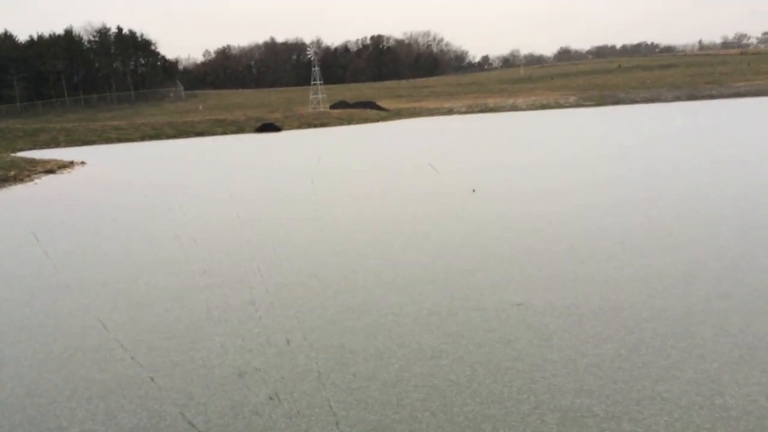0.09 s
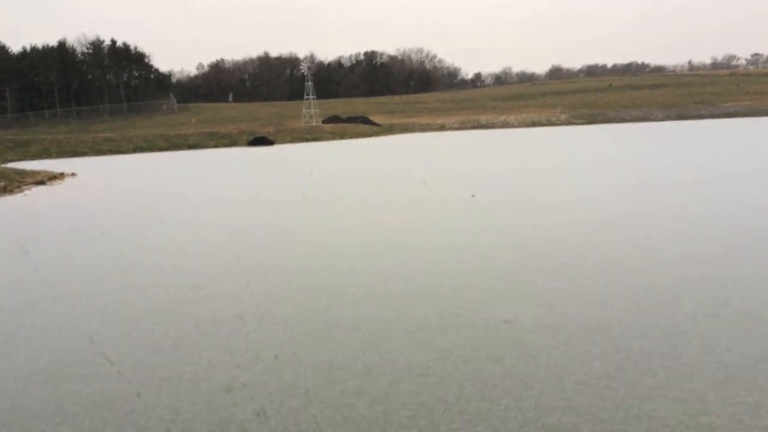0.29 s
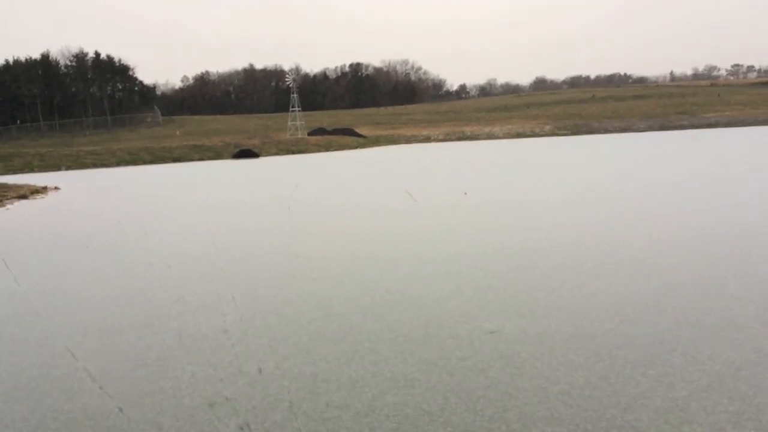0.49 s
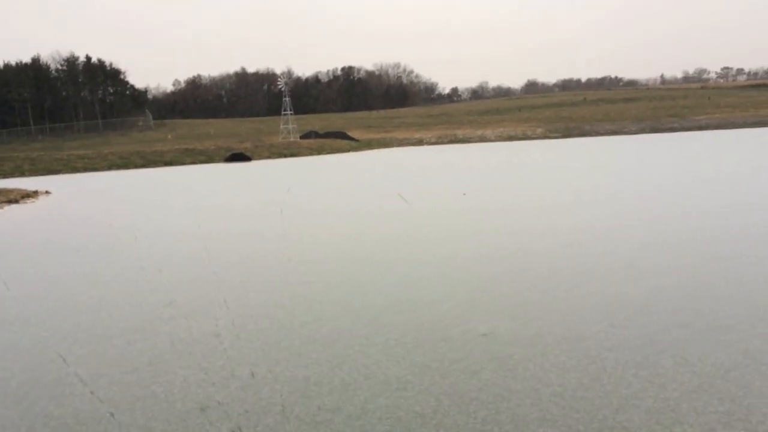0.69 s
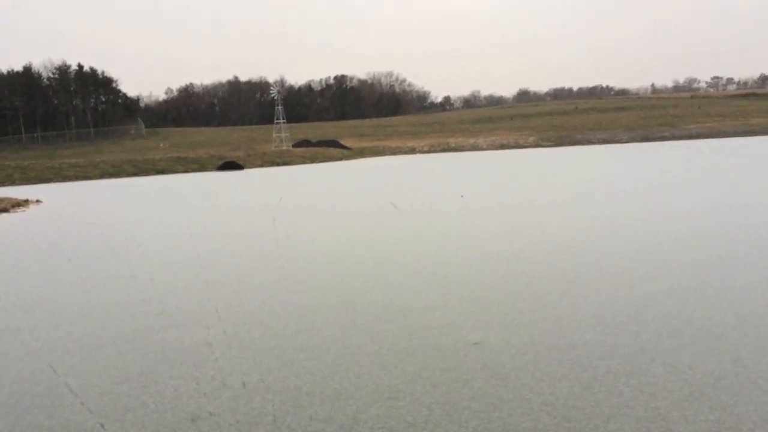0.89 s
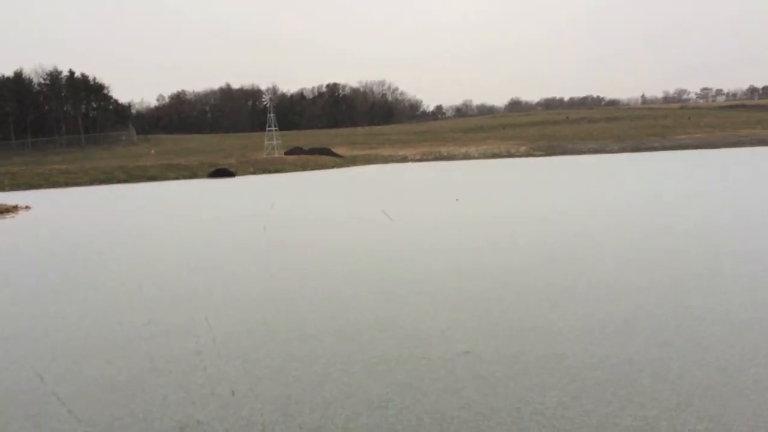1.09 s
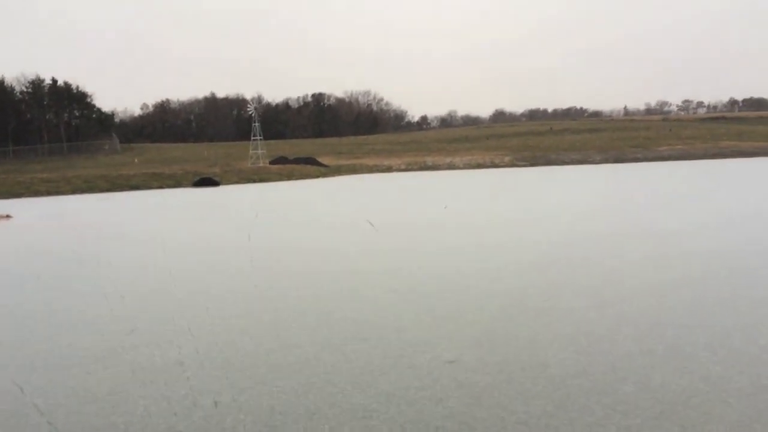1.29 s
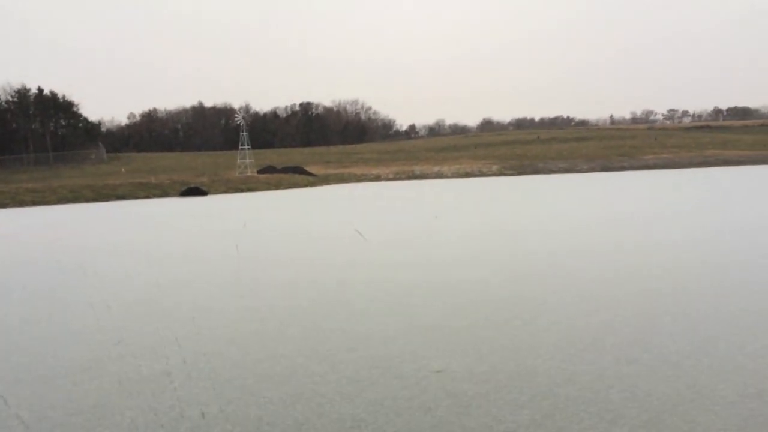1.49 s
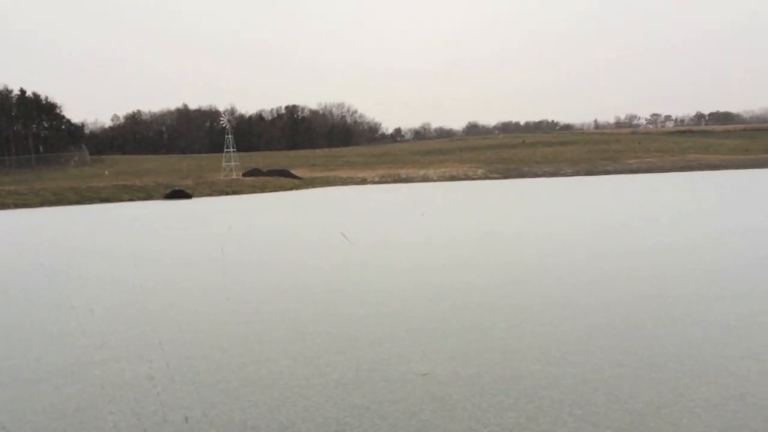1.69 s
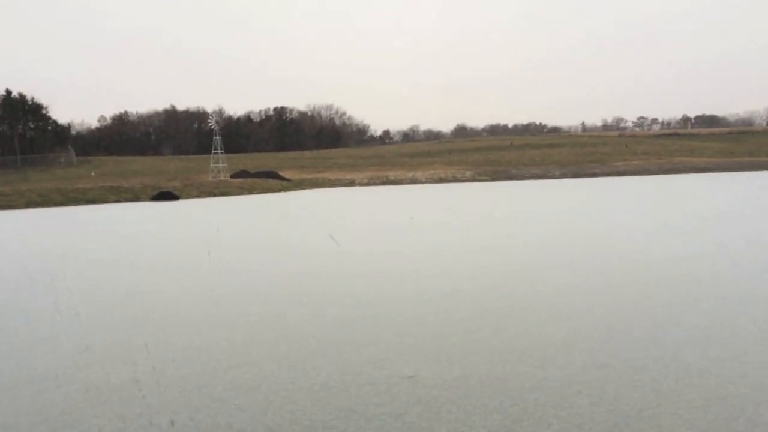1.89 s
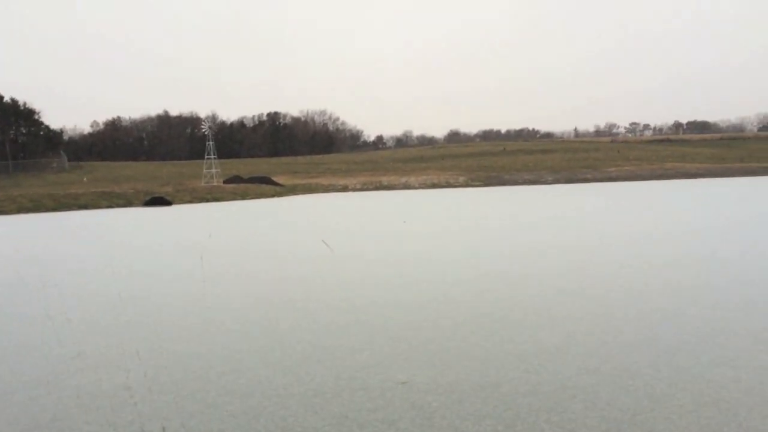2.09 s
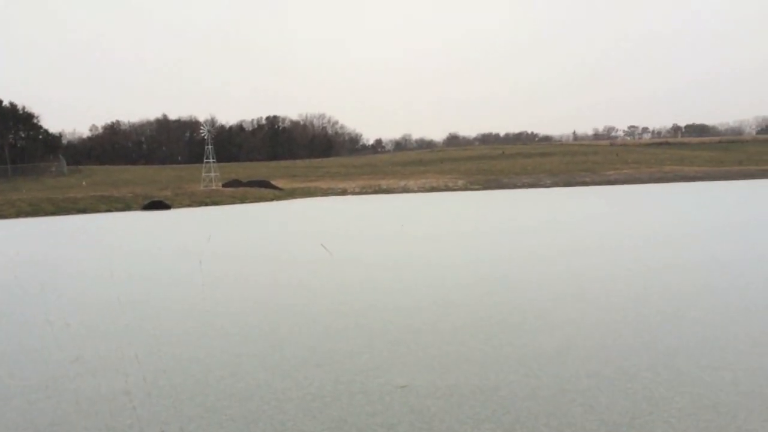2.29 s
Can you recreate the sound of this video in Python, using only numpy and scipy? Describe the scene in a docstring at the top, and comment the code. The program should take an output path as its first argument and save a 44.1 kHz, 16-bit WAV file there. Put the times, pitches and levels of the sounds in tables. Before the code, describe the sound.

Skipping stone on a thinly frozen pond: quick bird-like chirps dropping in pitch, echoing faintly from the banks

```python
"""At a thinly frozen pond, a stone skips away over the ice, often touching twice in one bounce.
Each touch sends a bending wave through the ice. Its treble runs ahead, so one hears a chirp that falls to
the pitch at which the wave is as slow as sound in air, and ends with the click that came through the air.
The banks scatter the chirps and the sheet rings on faintly, both as decaying noise.
Faint ticks crackle at the rim of the ice; a hush and a low rumble of coloured noise lie over the fields."""
import sys
import numpy as np
from scipy import signal
from scipy.fft import rfft, irfft, next_fast_len
from scipy.io import wavfile

SR = 44100
rng = np.random.default_rng(int(sys.argv[2]) if len(sys.argv) > 2 else 0)


def transcribe(u):
    """Save the signal u as a 16-bit wav file named by the first command-line argument.

    u: samples, shape (n,) or (channels, n), limited to [-1, 1]; the rate is SR.
    q: integer samples, one column per channel.
    """
    v = np.clip(np.atleast_2d(u).T, -1, 1)
    q = np.round(v * 32767).astype(np.int16)
    wavfile.write(sys.argv[1], SR, q)


N = 101430  # length in samples, 2.3 s
SOUND_M_PER_S = 335  # speed of sound in air
DISPERSION = 0.4  # the ice's wave number grows as pitch to this power
TOP_HZ = 15500  # band limit, where the chirps also begin


def stone():
    """Every touch sends a chirp and edge wave through the ice, a click through the air, and echoes."""
    # The stone's path. Each row: time in seconds, distance in m, pitch in Hz at which the ice wave
    stone_path = [(0.238, 10.6, 1164, 2.5), (0.458, 12.12, 1175, 2.5), (.8, 14.2, 1180, 3.5),
                  (1.0, 16.36, 1173, 7.5), (1.358, 18.1, 1158, 6), (1.661, 20.1, 1152, 5.5),
                  (2.03, 20.4, 1148, 4.5), (2.23, 21.5, 1195, 23)]
    # Touches of the stone. Each row: arrival of the click in seconds, relative level in dB,
    # contact time in ms, grit in dB, click over chirp in dB.
    touches = [(0.243, -19, 0.65, -18, 0), (0.458, -47.5, .6, -15.5, -7.5), (0.4644, -38, 0.7, -10, -28.5),
               (0.4693, -16.5, 0.16, -43, -2.5), (0.8, -29, 0.25, -13.5, -25),
               (0.8022, -38.6, 0.23, -3.5, 5), (0.9931, -31.5, 0.47, -11, -11.5),
               (1.0083, -34.5, 0.41, -16, 4), (1.3633, -22, .66, -20, -10),
               (1.3674, -36.5, 0.55, -11.5, -8.5), (1.6508, -40, 0.3, -15, 1),
               (1.6578, -31.5, 0.38, -29, -24), (1.6667, -23.5, .34, -25.5, -4.5),
               (2.025, -27.5, 0.41, -30, -16), (2.0321, -29, 0.4, -20, -0.5),
               (2.233, -38.5, 0.51, -19.5, -7), (2.242, -36.5, 0.43, -28, -6.5)]
    # Tone of the wave, which has little bass. Each row: pitch in Hz, level in dB.
    wave_tone = [(60, -30.5), (250, -12.5), (500, -2), (800, 0.5)]
    # Tone of the click through the air. Each row: pitch in Hz, level in dB.
    click_tone = [(100, -28.5), (400, -17), (1200, -9.5), (4000, -3), (8000, -8.5), (15000, -17)]

    out = np.zeros(N)
    times, *columns = np.transpose(stone_path)
    for click_s, db, contact_ms, grit_db, click_db in touches:
        metres, ice_hz, fade_db = [np.interp(click_s, times, column) for column in columns]
        falling = chirp(metres, ice_hz)
        fade = amp(np.linspace(0, -fade_db, len(falling)))
        wave = np.zeros(SR // 4)
        add(wave, 0, falling * fade)
        add(wave, 0, edge_wave(metres, ice_hz))
        wave = amp(db) * colour(force(wave, contact_ms, grit_db), wave_tone)

        # the click lands where the chirp ends
        start_s = click_s - len(falling) / SR
        click = colour(signal.unit_impulse(len(wave), len(falling)), click_tone)
        add(out, start_s, wave + amp(db + click_db) * click)
        add(out, start_s, signal.fftconvolve(wave, scatter()))
    return out


def chirp(metres, ice_hz):
    """Each pitch runs through the ice, leaves it at its own angle and goes on through the air."""
    # Tone of the chirp. Each row: pitch in Hz, level in dB.
    chirp_tone = [(1170, -3), (1250, 0), (1450, 2), (1800, 1.5), (2500, -4), (4000, -11), (7000, -17),
                  (14000, -40)]
    height_m = 1.6  # listening point above the ice

    hz = np.geomspace(TOP_HZ, ice_hz + 1, 2000)
    slow = (ice_hz / hz) ** (1 - DISPERSION)  # speed of sound in air over the wave's phase speed
    air_m = height_m / np.sqrt(1 - slow ** 2)
    ice_m = metres - air_m * slow
    # a packet of waves travels at group speed, so its delay in the ice is DISPERSION * slow
    arrival_s = (ice_m * DISPERSION * slow + air_m) / SOUND_M_PER_S
    direct_s = np.hypot(metres, height_m) / SOUND_M_PER_S
    t = np.arange(int(direct_s * SR)) / SR
    return (t > arrival_s[0]) * sweep(np.interp(t, arrival_s, hz), chirp_tone)


def edge_wave(metres, ice_hz):
    """The wave that leaves at the edge of the sheet, letting out pitches too slow to leave it earlier."""
    # Tone of the wave leaving the edge. Each row: pitch in Hz, level in dB.
    edge_tone = [(220, -58), (400, -34.5), (600, -21), (900, -16), (1300, -17), (2500, -52)]
    shore_s = 0.005167  # air path from the edge of the ice

    hz = np.geomspace(edge_tone[-1][0], edge_tone[0][0], 500)
    slow = (ice_hz / hz) ** (1 - DISPERSION)
    arrival_s = shore_s + metres * DISPERSION * slow / SOUND_M_PER_S
    t = np.arange(int(arrival_s[-1] * SR)) / SR
    fade_in = np.clip((t - arrival_s[0]) / 0.002, 0, 1)
    return fade_in * sweep(np.interp(t, arrival_s, hz), edge_tone)


def sweep(hz, points):
    """A sine that follows hz, its level set by its pitch, its phase counted back from its end."""
    turns = np.cumsum(hz) / SR
    return amp(along(points, hz)) * np.sin(2 * np.pi * (turns - turns[-1]))


def force(x, contact_ms, grit_db):
    """x driven by a half-sine push, whose length puts notches in the sweep, and by a hard snap."""
    # Hard snap of each touch. Each row: pitch in Hz, level in dB on top of the touch's grit.
    grit_tone = [(1200, -0.5), (3000, 1.5), (5000, -9), (7500, 2.5), (14000, 9)]

    m = next_fast_len(len(x) + 4096)
    hz = np.fft.rfftfreq(m, 1 / SR)
    cycles = hz * contact_ms / 1000
    push = (np.sinc(cycles - 0.5) + np.sinc(cycles + 0.5)) * np.pi / 4  # spectrum of a half-sine
    snap = 1j * amp(grit_db + along(grit_tone, hz))  # a quarter turn out of phase with the push
    return irfft(rfft(x, m) * (push + snap), m)[:len(x)]


def scatter():
    """The pond's answer: short echoes from the banks and the long faint ring of the sheet."""
    # Tone of the banks. Each row: pitch in Hz, level in dB.
    bank_tone = [(200, -26), (800, -11), (1300, -13.5), (2000, -18), (3000, -11.5), (6000, -16.5),
                 (12000, -21.5)]
    # Tone of the ringing sheet. Each row: pitch in Hz, level in dB.
    ring_tone = [(300, -50), (750, -22), (1000, -27), (1180, -28), (1400, -36), (2200, -41), (5000, -52)]
    bank_t60_s, bank_rise_s = 0.24, 0.0077
    echo_s, echo_spread_s, echo_db = 0.0474, 0.0061, -5.5  # the near bank answers in one clump
    ring_t60_s = 1.9

    t = np.arange(SR) / SR  # the answer is cut after one second

    def burst(envelope):
        """Noise under an envelope scaled to unit energy."""
        return envelope * rng.standard_normal(len(t)) / np.linalg.norm(envelope)

    banks = burst(amp(-60 * t / bank_t60_s) * (1 - np.exp(-t / bank_rise_s)))
    echo = burst(np.exp(-((t - echo_s) / echo_spread_s) ** 2))
    ring = burst(amp(-60 * t / ring_t60_s))
    return colour(banks + amp(echo_db) * echo, bank_tone) + colour(ring, ring_tone)


def shore_ticks():
    """Tiny crackles in the rim of the ice, each a quickly dying burst of noise."""
    # Faint ticks at the shore. Each row: start in seconds, level in dB ahead of trim and tone.
    ticks = [(0.7688, -43.5), (0.7722, -48), (0.9537, -53.5), (1.3268, -48.5), (1.3318, -67),
             (1.6259, -52.5), (1.635, -49.5), (1.975, -54.5)]
    # Tone of the ticks. Each row: pitch in Hz, level in dB.
    tick_tone = [(2000, 16), (6000, -3), (14000, 0.5)]
    trim_db, t60_s = -4.5, 0.0087

    out = np.zeros(N)
    t = np.arange(SR // 50) / SR
    for start_s, db in ticks:
        decay = amp(db + trim_db - 60 * t / t60_s)
        add(out, start_s, decay * rng.standard_normal(len(t)))
    return colour(out, tick_tone)


def fields():
    """Steady outdoor hush and a distant rumble that swells and sinks, both coloured noise."""
    # Tone of the hush. Each row: pitch in Hz, relative level in dB.
    hush_tone = [(20, -46.5), (45, -17), (70, -6), (120, -6.5), (165, -15), (300, -16), (550, -21),
                 (750, -19), (950, -21.5), (1190, -19.5), (1500, -26.5), (2500, -31.5), (6000, -34.5),
                 (15000, -38.5)]
    # Swells of the rumble. Each row: time in seconds, level in dB ahead of the trim.
    swells = [(0.0, -68.5), (0.11, -55.5), (0.15, -64), (1.43, -62.5), (1.45, -53.5), (1.68, -63.5),
              (1.99, -55.5), (2.3, -61)]
    # Tone of the rumble. Each row: pitch in Hz, relative level in dB.
    rumble_tone = [(20, -34.5), (45, -3.5), (70, -0.5), (120, 0.5), (170, -10), (350, -30), (900, -77)]
    hush_db, rumble_trim_db = -70.5, -5

    swell_db = np.interp(np.arange(N) / SR, *np.transpose(swells))
    hush = amp(hush_db) * noise(hush_tone)
    rumble = amp(swell_db + rumble_trim_db) * noise(rumble_tone)
    return hush + rumble


def amp(db):
    """Decibels to gain."""
    return 10 ** (np.asarray(db) / 20)


def along(points, hz):
    """(Hz, value) points read on a log pitch axis."""
    f, v = np.transpose(points)
    return np.interp(np.log(hz + 1), np.log(f + 1), v)


def colour(x, points):
    """x shaped by a spectrum of (Hz, dB) points."""
    m = next_fast_len(len(x) + 4096)
    gain = amp(along(points, np.fft.rfftfreq(m, 1 / SR)))
    return irfft(rfft(x, m) * gain, m)[:len(x)]


def noise(points):
    """Coloured noise of rms 1."""
    x = colour(rng.standard_normal(N), points)
    return x / x.std()


def add(track, s, x):
    """Mix x into the track from time s, at the earliest from its beginning."""
    i = max(round(s * SR), 0)
    track[i:i + len(x)] += x[:max(len(track) - i, 0)]


def scene():
    """The pond, heard from its shore."""
    return (stone() + shore_ticks() + fields())[None]


def record(dry):
    """The recorder keeps nothing above its band limit."""
    m = next_fast_len(N + 4096)
    in_band = np.fft.rfftfreq(m, 1 / SR) < TOP_HZ
    return irfft(rfft(dry, m) * in_band, m)[:, :N]


dry = scene()
out = record(dry)
transcribe(out)
```